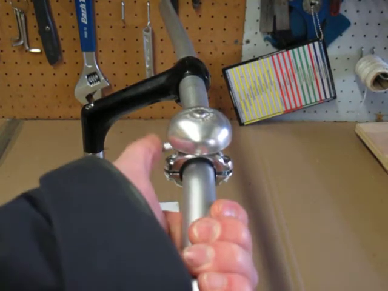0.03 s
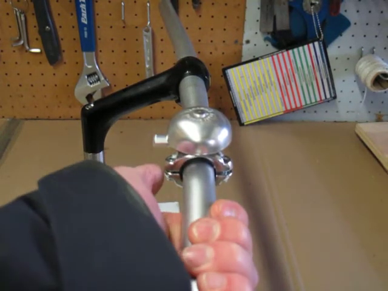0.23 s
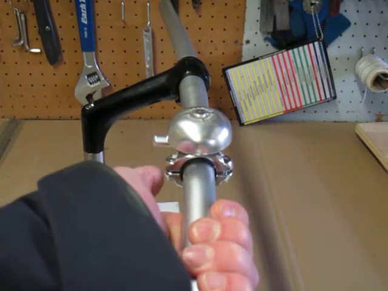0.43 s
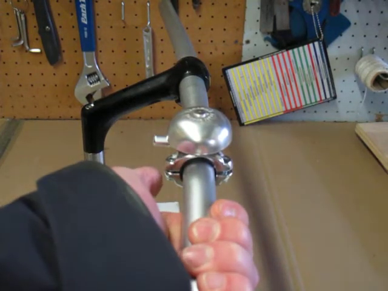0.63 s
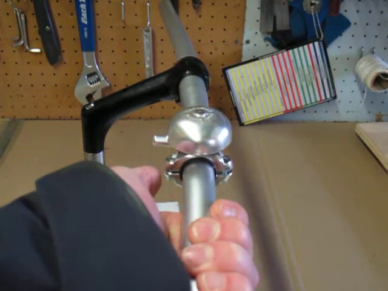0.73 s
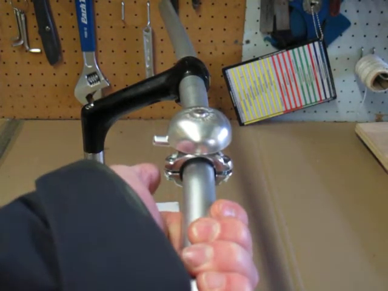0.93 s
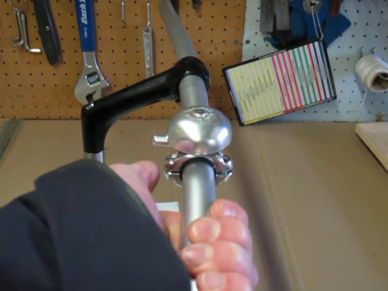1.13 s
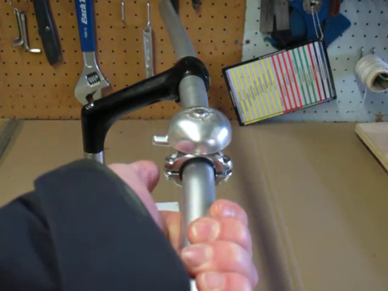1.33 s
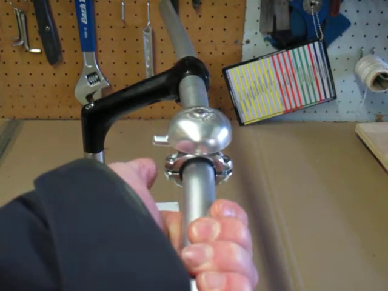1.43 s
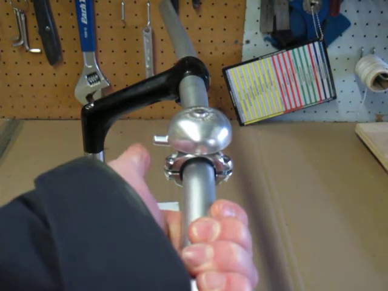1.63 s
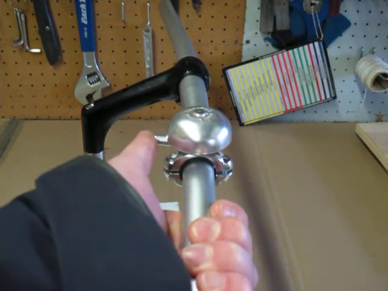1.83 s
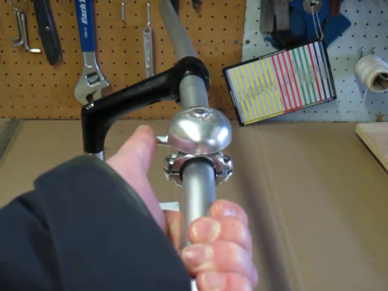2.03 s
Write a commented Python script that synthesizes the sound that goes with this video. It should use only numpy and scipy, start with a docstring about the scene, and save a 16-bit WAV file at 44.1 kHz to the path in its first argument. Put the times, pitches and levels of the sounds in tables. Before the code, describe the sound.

A metal bicycle bell rings once, close to the microphone in a quiet workshop. Its striker ticks faintly, then hits with a brief rattle, and the high, clear tone fades slowly over soft room noise.

```python
"""A metal bicycle bell in a quiet workshop, over room tone, a small motor and a thin electrical whine.
At 0.1 s a thumb draws back the sprung striker, which ticks twice. At 0.21 s it hits the dome, rattles
and bounces, its coil spring jangling. A gain control ducks at the blow and recovers, so the lowest
tone seems to swell. The dome rings on with a slow beat and the handlebar hums faintly.
A sleeve rustles throughout, most near 0.94 s."""
import sys
import numpy as np
from scipy import signal
from scipy.fft import rfft, irfft
from scipy.io import wavfile

SR = 44100
rng = np.random.default_rng(int(sys.argv[2]) if len(sys.argv) > 2 else 0)


def int16_out(signal):
    """Quantize to a 16-bit WAV file."""
    q = np.round(np.clip(np.atleast_2d(signal).T, -1, 1) * 32767)
    wavfile.write(sys.argv[1], SR, q.astype(np.int16))


N = 92610
T = np.arange(N) / SR
STRIKE_S, BOUNCE_S = 0.2120, 0.2322
SPRING_HZ = 95.6   # the striker quivering on its spring


def from_db(db):
    """Decibels to gain."""
    return 10 ** (np.asarray(db) / 20)


def decay(start_s, t60_s):
    """Envelope that jumps to 1 and dies away."""
    return (T >= start_s) * from_db(-60 * np.clip((T - start_s) / t60_s, 0, 5))


def sine(hz, start_s):
    """Sine with zero phase at start_s."""
    return np.sin(2 * np.pi * hz * (T - start_s))


def ring(modes, start_s):
    """Struck modes of alternating sign, each dying at its own rate."""
    return sum(from_db(db) * decay(start_s, t60_s) * sine(hz, start_s) * (-1) ** k
               for k, (hz, db, t60_s) in enumerate(modes))


def noise(spectrum):
    """Steady noise, rms 1, shaped by (Hz, dB) points."""
    hz, db = np.transpose(sorted(spectrum))
    bins_hz = np.maximum(np.fft.rfftfreq(N, 1 / SR), 1)
    shape = from_db(np.interp(np.log(bins_hz), np.log(hz), db))
    x = irfft(rfft(rng.standard_normal(N)) * shape, N)
    return x / x.std()


def smooth(x, lag_s):
    """One-pole lag."""
    pole = np.exp(-1 / (lag_s * SR))
    return signal.lfilter([1 - pole], [1, -pole], x)


# Dome modes, low to high. Each entry: frequency in Hz.
DOME_HZ = [2825.2, 7285.5, 10130, 12966]
# The same modes. Each row: level in dB, t60 in seconds, gain before the bounce, beat in Hz,
# twin's relative level in dB, time of one beat peak in seconds after the strike.
DOME_MODES = [(-6, 3.926, 1.88, 6.3, -15, .054), (5.5, 0.74, 0.3664, 8.2, -11.5, 0.14),
              (-39, 0.91, .5, 12, -13.5, .1), (5, 0.23, 0.32, 20.5, -4.5, 0.047)]


def dome():
    """Close pairs of modes beat; the bounce rebalances them."""
    age_s = T - STRIKE_S
    partials = []
    for hz, (db, t60_s, early_gain, beat_hz, twin_db, peak_s) in zip(DOME_HZ, DOME_MODES):
        envelope = from_db(db) * np.where(T < BOUNCE_S, early_gain, 1) * decay(STRIKE_S, t60_s)
        pair = 1 + from_db(twin_db) * np.exp(-2j * np.pi * beat_hz * (age_s - peak_s))
        partials.append(envelope * np.imag(pair * np.exp(2j * np.pi * hz * age_s)))
    # A slight regular flutter, and a faint random roughness around each tone.
    flutter = 0.017 * sine(SPRING_HZ, STRIKE_S) + 0.012 * sine(hz=37.4, start_s=STRIKE_S)
    noise_skirt = 0.005 * noise([(130, 0), (1300, -70)])
    octave = from_db(-26) * np.imag(signal.hilbert(partials[0]) ** 2) * (T >= STRIKE_S)
    return sum(partials) * (1 + flutter + noise_skirt) + octave


# Striker hits. Each row: start in seconds, level in dB.
BLOWS = [(STRIKE_S, 0), (.2205, -13), (.2252, -16), (BOUNCE_S, -8)]
# Striker and mount modes. Each row: frequency in Hz, level in dB, t60 in seconds.
STRIKER_MODES = [(60, -24, .05), (486, -17, 0.02174), (718, -20, .022), (978, -13.5, 0.05),
                 (1457.6, -24, .3), (1562, -14.5, 0.055), (3048, 2.5, .025), (4328, 7.5, 0.028),
                 (4730, 1.5, 0.041), (4885, 3.5, 0.066), (5555, -24.5, 0.35), (6530, -15.5, .07),
                 (8288, -9, .05), (8560, -3, 0.036), (9034, -2.5, .035), (9680, -13.5, .04)]
# Coil spring's thin jangle. Each row: frequency in Hz, level in dB, t60 in seconds.
COIL_MODES = [(4470, -22.5, .35), (4484, -22.5, .4), (4600, -24.5, .4), (4600, -24.5, .42),
              (4738, -26.5, .35), (4886, -24, 0.25)]
# Crack of a blow. Each row: frequency in Hz, relative density in dB.
CRACK_SPECTRUM = [(40, -7), (250, -28), (500, -9.5), (800, -9.5), (2200, -19.5), (4600, 5), (6000, -1),
                  (9000, 3.5), (11000, -11), (15500, -17)]


def striker(rise_s=0.00093):
    """Each blow cracks and rings briefly; the first also excites the coil and the room."""
    crack = from_db(4) * noise(CRACK_SPECTRUM)
    blows = sum(from_db(db) * (ring(STRIKER_MODES, start_s) + crack * decay(start_s, t60_s=0.037))
                for start_s, db in BLOWS)
    attack = 1 - np.exp(-np.maximum(T - STRIKE_S, 0) / rise_s)
    return attack * (blows + ring(COIL_MODES, STRIKE_S) + room_tail())


# Room's answer to the blow. Each row: frequency in Hz, relative density in dB.
TAIL_SPECTRUM = [(100, -22.5), (600, -24.5), (1500, -4), (2300, -14.5), (3700, -6), (4550, -0.5),
                 (5200, -1), (9000, -3.5), (11000, -13.5), (15500, -22.5)]


def room_tail(split_hz=6360):
    """Diffuse tail of the first blow; the treble dies sooner."""
    tail = from_db(-9.5) * noise(TAIL_SPECTRUM)
    low = signal.sosfilt(signal.butter(4, split_hz, "low", fs=SR, output="sos"), tail)
    high = signal.sosfilt(signal.butter(4, split_hz, "high", fs=SR, output="sos"), tail)
    return low * decay(STRIKE_S, t60_s=0.27) + high * decay(STRIKE_S, t60_s=0.22)


# Handlebar and clamp modes. Each row: frequency in Hz, level in dB, t60 in seconds.
HANDLEBAR_MODES = [(502, -50.5, 2.2), (686, -43, 2), (768, -41.5, 1.3), (803, -49.5, 2.2),
                   (1042, -49.5, 2.2), (1050, -47, 1.6), (1260, -51.5, 2), (1385, -43.5, 1.6),
                   (1675, -53, 2.2)]


def handlebar(rise_s=0.4, waver_db=3, waver_hz=4.3):
    """The bar and the striker's spring slowly take up the blow and hum on; the bar's modes waver."""
    bar = np.zeros(N)
    for mode in HANDLEBAR_MODES:
        drift = noise([(waver_hz, 0), (10 * waver_hz, -90)])
        bar += ring([mode], STRIKE_S) * from_db(waver_db * drift)
    spring = from_db(-37) * decay(STRIKE_S, t60_s=1.72) * sine(SPRING_HZ, STRIKE_S)
    swell = 1 - np.exp(-(np.maximum(T - STRIKE_S, 0) / rise_s) ** 2)
    return swell * (bar + spring)


# Draw-back ticks. Each row: start in seconds, level in dB.
TICKS = [(.1040, -36.5), (0.1075, -39)]
# Tick noise. Each row: frequency in Hz, relative density in dB.
TICK_SPECTRUM = [(300, -19), (1500, -11.5), (2500, -10), (3500, 0.5), (6500, -3), (7200, -9.5), (8700, 3.5),
                 (10400, -1.5), (12000, -17.5), (16000, -24)]


def ticks(t60_s=0.019, room_db=-15.5, room_t60_s=0.18):
    """The striker slips under the thumb: two small ticks with a short room tail."""
    envelope = sum(from_db(db) * (decay(start_s, t60_s) + from_db(room_db) * decay(start_s, room_t60_s))
                   for start_s, db in TICKS)
    return envelope * noise(TICK_SPECTRUM)


# Rustle envelope. Each row: time in seconds, level in dB.
SLEEVE_LEVEL = [(0, -57.5), (.09, -58), (.2, -59), (.45, -67.5), (.87, -68), (.94, -52), (1.03, -65),
                (1.2, -67), (1.35, -66), (1.55, -69), (2.1, -67)]
# Cloth noise. Each row: frequency in Hz, relative density in dB.
SLEEVE_SPECTRUM = [(2000, -19), (3500, -7.5), (6000, -7.5), (9000, -1.5), (10500, -5), (12000, -20),
                   (15500, -25.5)]


def sleeve():
    """Cloth rustles: bright noise that rises and falls."""
    return from_db(np.interp(T, *np.transpose(SLEEVE_LEVEL))) * noise(SLEEVE_SPECTRUM)


# Motor hum. Each row: harmonic number, level in dB.
MOTOR_HARMONICS = [(4, -68), (5, -64.5), (6, -71.5), (8, -73.5), (9, -73.5), (10, -71.5)]
# Hum envelope. Each row: time in seconds, gain in dB.
MOTOR_GAIN = [(0, -2), (.5, -1), (.66, 5), (.87, 3), (.96, -4), (1.1, -4), (1.2, 3.5), (1.33, 0.5),
              (1.45, -8.5), (1.58, 3), (1.72, 2), (1.88, -11), (2.1, -4.5)]


def motor(fundamental_hz=150.2):
    """Faint harmonics of a small motor come and go."""
    hum = sum(from_db(db) * sine(harmonic * fundamental_hz, 0) for harmonic, db in MOTOR_HARMONICS)
    return from_db(np.interp(T, *np.transpose(MOTOR_GAIN))) * hum


# Workshop air. Each row: frequency in Hz, relative density in dB.
AIR_SPECTRUM = [(20, -10), (80, -0.5), (150, -3), (400, -7), (800, -9), (1400, -11.5), (2200, -14.5),
                (3200, -25), (4500, -20), (9000, -28.5), (11000, -30.5), (12500, -35.5), (16000, -38)]


def room_tone(air_db=-58, whine_hz=5886, whine_db=-65):
    """Steady low noise and a thin electrical whine."""
    return from_db(air_db) * noise(AIR_SPECTRUM) + from_db(whine_db) * sine(whine_hz, 0)


def scene():
    """All sources, summed to one channel."""
    return (dome() + striker() + handlebar() + ticks() + sleeve() + motor() + room_tone())[None]


def gain_control(x, limit_db=-12.5, max_cut_db=24, attack_s=0.0024, release_db_per_s=111.5, step_db=0.13):
    """Ducks loud sound within milliseconds and recovers slowly in small steps."""
    over_db = np.clip(20 * np.log10(np.abs(x) + 1e-9) - limit_db, 0, max_cut_db)
    release_db = release_db_per_s * T
    held_db = np.maximum.accumulate(over_db + release_db, axis=-1) - release_db
    cut_db = step_db * np.round(smooth(held_db, attack_s) / step_db)
    return x * from_db(-smooth(cut_db, lag_s=0.00007))


def record(dry, ceiling=0.6, notch_hz=11800, cutoff_hz=15700):
    """Gain control, clipping of the blow's first instant, a narrow treble dip and a steep top cut."""
    clipped = np.clip(gain_control(dry), -ceiling, ceiling)
    notched = signal.lfilter(*signal.iirnotch(notch_hz, Q=5.9, fs=SR), clipped)
    return signal.sosfilt(signal.ellip(10, 0.1, 80, cutoff_hz, fs=SR, output="sos"), notched)


dry = scene()
out = record(dry)
int16_out(out)
```